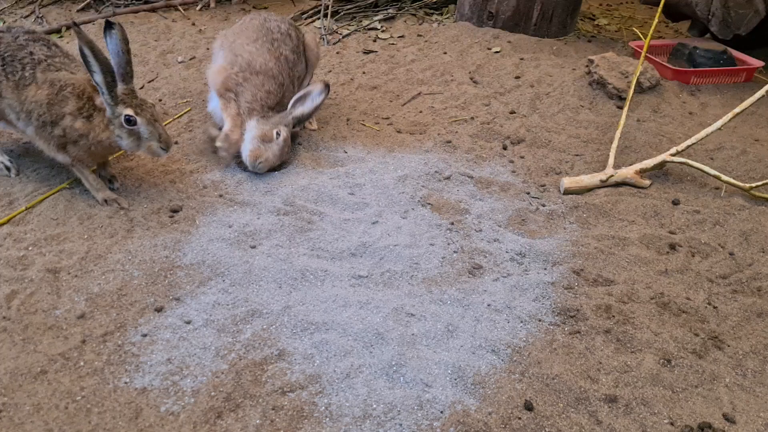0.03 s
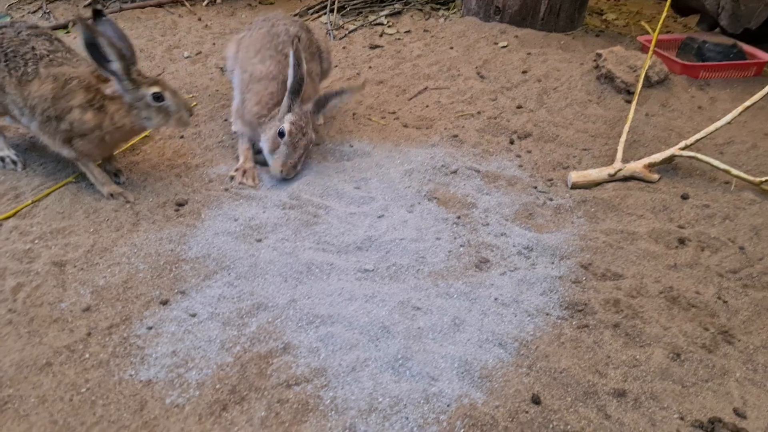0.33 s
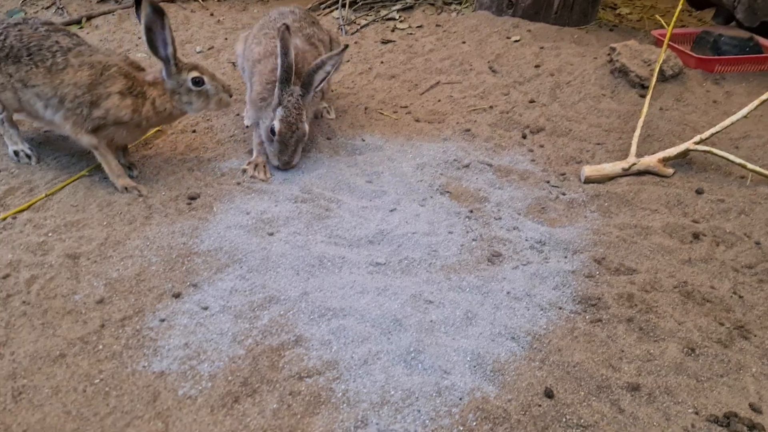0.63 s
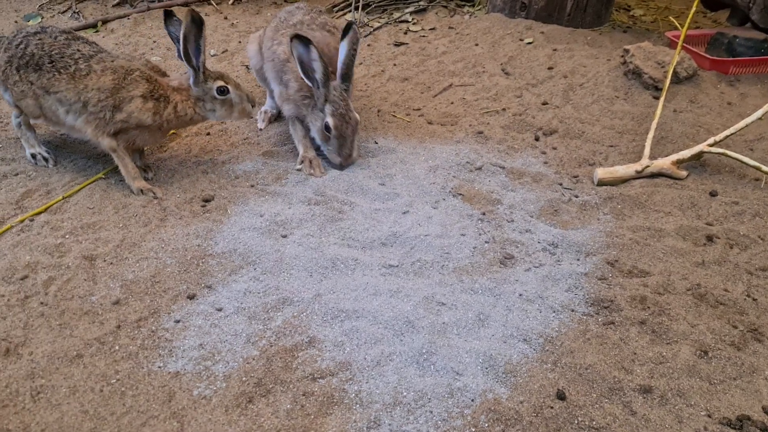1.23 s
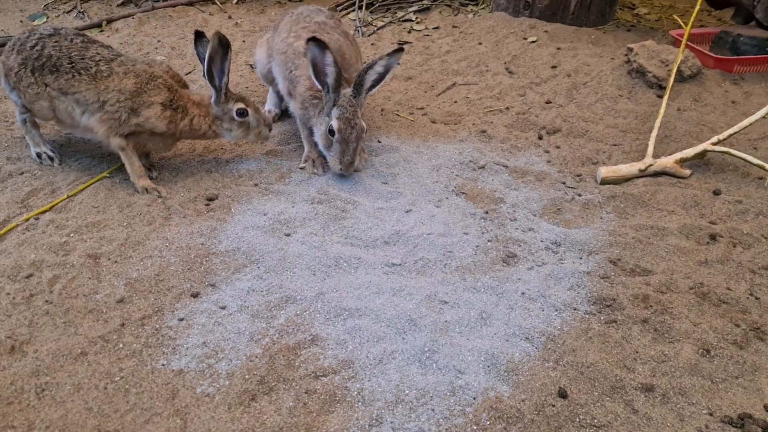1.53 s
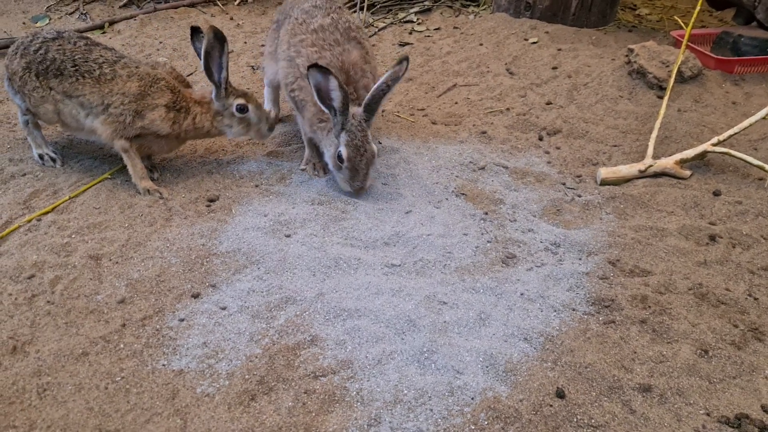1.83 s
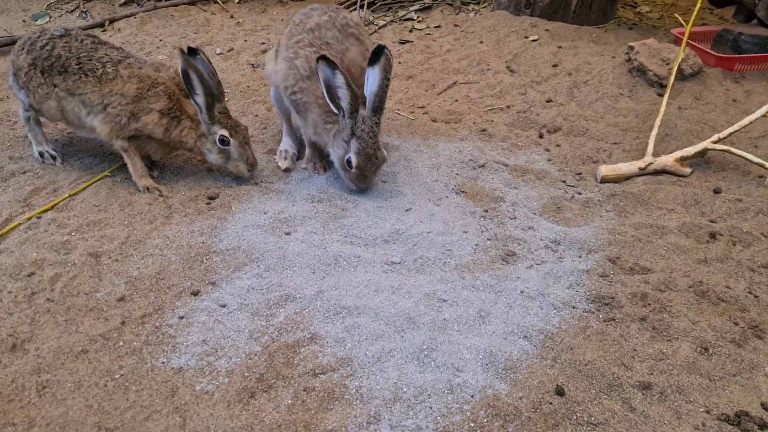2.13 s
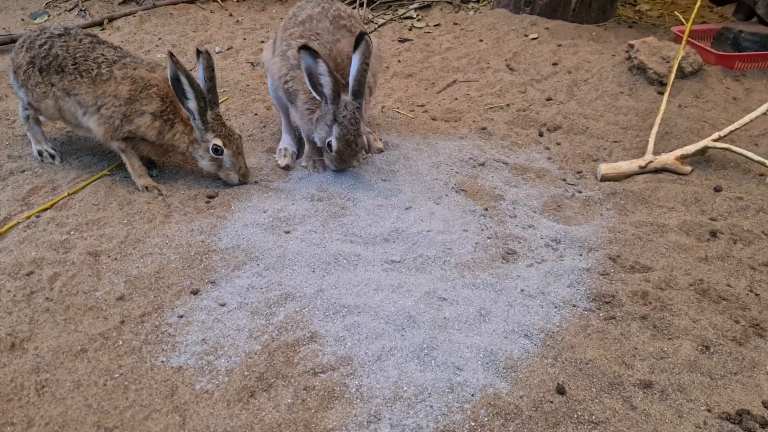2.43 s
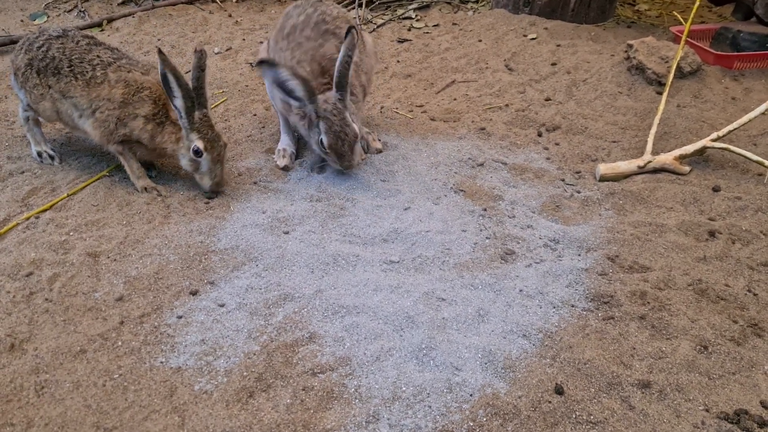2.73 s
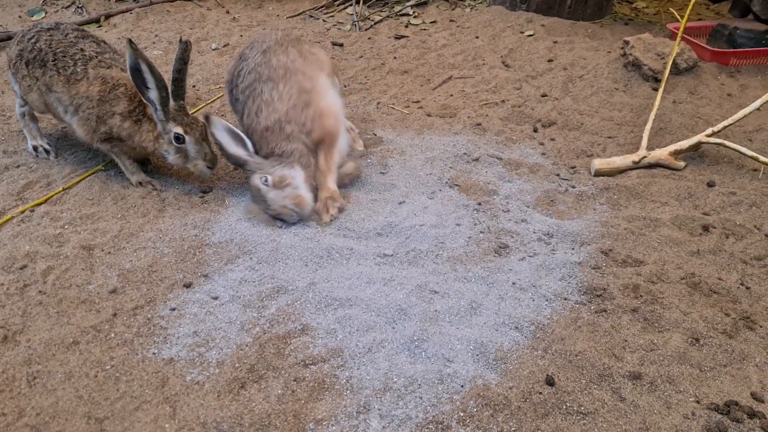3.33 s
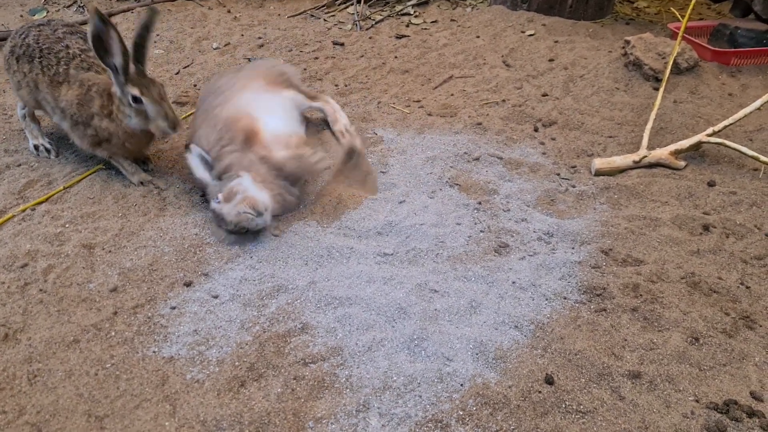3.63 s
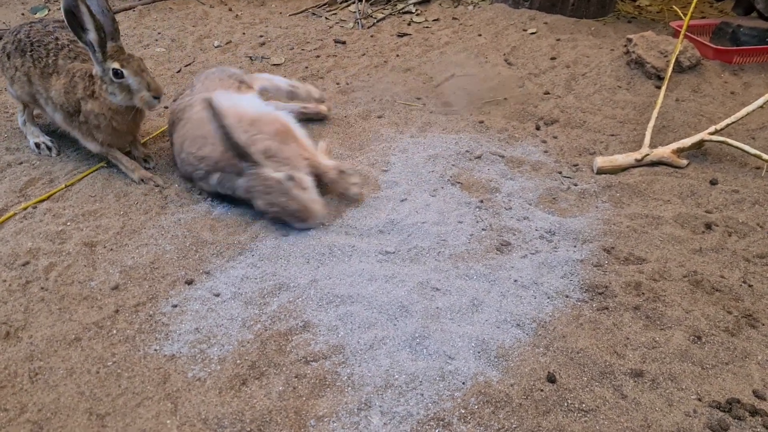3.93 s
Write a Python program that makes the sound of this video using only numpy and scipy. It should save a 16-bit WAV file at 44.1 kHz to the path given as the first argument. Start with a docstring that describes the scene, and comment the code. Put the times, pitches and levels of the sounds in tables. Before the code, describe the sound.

Two hares shuffle on dry sand, with soft paw thumps and gritty ticks over low rumble.

```python
"""A yard of dry sand, heard through a stereo pair of microphones. Two hares shuffle about and one rolls
over in a patch of ash: paws thump softly, grit ticks under the claws, sand scuffs and fur drags.
Far behind them an engine drones and fades over low outdoor rumble and quiet air; in the second half
come a distant whistling swell, a thin whir and one faint peep.
The microphones hiss faintly, brighter on the right."""
import sys
import numpy as np
from scipy import signal
from scipy.fft import rfft, irfft, next_fast_len
from scipy.io import wavfile
from scipy.ndimage import map_coordinates

SR = 44100
rng = np.random.default_rng(int(sys.argv[2]) if len(sys.argv) > 2 else 0)


def store_wav(level_fs):
    """Save 16-bit WAV to argv[1]."""
    pcm = np.round(np.clip(np.atleast_2d(level_fs), -1, 1) * 32767)
    wavfile.write(sys.argv[1], SR, pcm.T.astype(np.int16))


N = 176400
TIME = np.arange(N) / SR


def amp(db):
    """Decibels to gain."""
    return 10 ** (np.asarray(db) / 20)

def unit(x):
    """Scale to rms 1."""
    return x / np.sqrt(np.mean(x ** 2) + 1e-20)

def along(points, hz):
    """Read (freq_hz, value) points on a log frequency axis."""
    freqs, values = np.transpose(points)
    return np.interp(np.log(hz + 1), np.log(freqs + 1), values)

def curve(points):
    """Join (time_s, value) points with lines."""
    return np.interp(TIME, *np.transpose(points))

def wobble(per_s):
    """A smooth random curve with per_s knots a second."""
    return map_coordinates(rng.standard_normal(400), [TIME * per_s], mode="wrap")

def tone(pitch_hz):
    """A sine of rms 1 that follows a moving pitch."""
    return np.sqrt(2) * np.sin(2 * np.pi * np.cumsum(pitch_hz) / SR)

def filtered(x, response):
    """Pass x through a frequency response."""
    n = x.shape[-1]
    padded = next_fast_len(n + 4096)
    return irfft(rfft(x, padded) * response(np.fft.rfftfreq(padded, 1 / SR)), padded)[..., :n]

def band(x, centre_hz, octaves):
    """A bell-shaped band of x, at rms 1."""
    return unit(filtered(x, lambda hz: np.exp(-.5 * (np.log2((hz + 1) / centre_hz) / octaves) ** 2)))

def pan(db):
    """Left and right gains for a left-minus-right difference."""
    return amp(np.array([db, -db]) / 2).reshape(2, -1)

def from_afar(x, lead_s=.00033):
    """Far bass reaches the left microphone first and is slightly louder on the right."""
    return filtered(x, lambda hz: np.exp(1j * np.pi * hz * lead_s * np.array([[1], [-1]]))) * pan(-.5)

def grains(per_s, size):
    """Random impacts of uneven strength, reaching both microphones."""
    hits = (rng.random(size) < per_s / SR) * amp(3 * rng.standard_normal(size))
    return hits * rng.standard_normal((2, size))

def stroke(progress, rise_share=.15):
    """Rise and fall of a sliding movement; progress is time over its length."""
    return np.minimum(progress / rise_share, 1) * np.exp(-progress ** 3)

def add(track, start_s, x):
    """Mix x into track at start_s."""
    part = track[..., max(round(start_s * SR), 0):][..., :x.shape[-1]]
    part += x[..., :part.shape[-1]]


# How alike the two microphones hear steady noise: freq_hz, correlation
MIC_LIKENESS = [(60, .99), (130, 1), (250, 0.9), (500, 0.6), (1000, 0), (16000, 0)]
def rush(spectrum):
    """Stereo noise of rms 1, alike in the bass and unrelated in the treble."""
    def response(hz):
        angle = np.arccos(np.clip(along(MIC_LIKENESS, hz), -1, 1)) / 2
        return amp(along(spectrum, hz)) * [np.cos(angle), np.sin(angle)]
    mid, side = filtered(rng.standard_normal((2, N)), response)
    return unit(np.array([mid + side, mid - side]))


# The engine's firing tone, far off: time_s, pitch_hz
ENGINE_PITCH = [(0, 53.5), (.8, 54), (1.4, 54.5), (2.1, 53), (4, 55)]
# That tone and the hum above it, as they reach the yard: time_s, level_db
ENGINE_LEVEL = [(.07, -53.5), (.4, -47.5), (.6, -45.5), (1.1, -47), (1.4, -46), (1.7, -50), (2.1, -56),
                (3.1, -64), (4, -57)]
ENGINE_HUM_LEVEL = [(0, -66), (1.5, -61), (2.8, -63.5), (3.3, -74), (4, -78)]
def engine(hum_hz=98.36):
    """A far engine's wavering firing tone, and a weaker hum."""
    firing = tone(curve(ENGINE_PITCH) + .48 * wobble(4.97))
    firing *= amp(curve(ENGINE_LEVEL) + .8 * wobble(16))
    hum = amp(curve(ENGINE_HUM_LEVEL) + .33 * wobble(14)) * tone(hum_hz + wobble(3.94))
    return from_afar(firing + hum)


# Rumble and air all around the yard: freq_hz, density_db
RUMBLE_SPECTRUM = [(15, -8), (28, 2), (42, -10), (63, 4.5), (80, -1.5), (110, -7.5), (150, -7.5),
                   (185, -13), (220, -13.5), (270, -29), (450, -56.5)]
AIR_SPECTRUM = [(120, -1.5), (250, 1.5), (400, -2), (700, 2.5), (1100, 0), (1700, -10), (2300, -14.5),
                (3500, -16), (6000, -47), (15000, -74)]
# Their slow drift: time_s, level_db
RUMBLE_DRIFT = [(0, -56), (1, -57.5), (2.2, -57.5), (2.6, -55), (3.1, -55.5), (3.5, -58), (4, -60)]
AIR_DRIFT = [(0, -69), (.6, -67), (1.5, -67.5), (2.4, -68), (3.2, -67.5), (4, -69.5)]
def outdoors():
    """Low rumble and quiet air, both gently wavering."""
    rumble = amp(curve(RUMBLE_DRIFT) + wobble(8.1)) * rush(RUMBLE_SPECTRUM)
    air = amp(curve(AIR_DRIFT) + .92 * wobble(8.04)) * rush(AIR_SPECTRUM)
    return from_afar(rumble) + air * pan(-.06)


# Feet pushing through the sand: start_s, length_s, level_db, centre_hz, width_octaves
SAND_SCUFFS = [(0.061, 0.044, -65.5, 4040, 5.2), (0.101, 0.18, -78, 10100, 2.3),
               (.212, 0.048, -77, 4840, 0.44), (.55, 0.11, -78, 2040, 1.8), (0.976, 0.14, -74.5, 7000, 2.6),
               (1.208, 0.048, -74.5, 11800, 0.73), (1.409, 0.029, -73, 3550, 1.4),
               (1.446, 0.15, -76, 8300, 0.89), (1.72, 0.072, -71, 4650, 2.5), (1.99, 0.054, -84, 11500, .3),
               (2.026, 0.15, -74.5, 11500, 0.21), (2.37, 0.031, -67, 13300, 0.35),
               (2.371, 0.042, -70.5, 6700, 0.22), (2.376, 0.037, -68, 11030, .08),
               (2.85, .05, -79, 12000, 0.51), (3.061, 0.041, -75, 6000, 3.6),
               (3.664, 0.35, -76.5, 8400, 0.59), (3.76, 0.087, -72, 7060, 0.81),
               (3.773, 0.052, -67, 9900, 0.19), (3.962, 0.11, -69, 8160, 1.6)]
def scuffs():
    """Each scuff shifts many grains in one stroke."""
    out, t = np.zeros((2, N)), np.arange(SR // 3) / SR
    for start_s, length_s, db, hz, octaves in SAND_SCUFFS:
        sliding = band(grains(per_s=3500, size=len(t)), hz, octaves)
        add(out, start_s, amp(db + 2.5) * stroke(t / length_s) * sliding)
    return out


def trickle():
    """Loose grains keep trickling, faintly heard between the steps."""
    return amp(-90.5 + 4.9 * wobble(4.9)) * band(grains(per_s=900, size=N), 8000, octaves=.56)


# Grit underfoot: start_s, level_db, centre_hz, width_octaves, t60_s
GRIT_TICKS = [(0.143, -58, 5030, 0.72, 0.0081), (0.515, -52.5, 1670, 1, 0.024),
              (.521, -52, 6100, 0.22, 0.039), (0.552, -54, 2200, .9, 0.022),
              (0.565, -54, 2600, 0.92, 0.016), (.635, -62, 11500, 0.36, 0.037),
              (0.808, -58, 6000, 0.51, 0.016), (0.864, -57, 7050, 0.53, 0.022),
              (0.989, -61, 5300, 0.42, 0.035), (1.013, -55, 5700, 0.47, 0.034), (1.065, -72, 7000, .6, .03),
              (1.08, -51, 7940, 0.48, 0.031), (1.129, -57, 8000, 0.53, 0.04),
              (1.182, -53.5, 5160, 0.57, 0.039), (1.218, -63, 11500, .35, .025), (1.405, -53, 8500, 1, .03),
              (1.615, -60.5, 5060, 0.71, 0.081), (1.667, -57, 7760, 0.74, 0.1),
              (1.801, -54.5, 5800, 0.76, 0.039), (2.465, -54.5, 8400, 0.88, 0.044),
              (2.541, -57.5, 6760, 0.17, 0.03), (2.613, -52.5, 6000, 0.33, 0.016),
              (2.905, -58, 6000, .2, 0.02), (3.057, -53, 6500, 0.76, 0.016),
              (3.176, -51, 7500, 0.29, 0.022), (3.198, -59.5, 1830, 0.51, 0.08),
              (3.28, -50.5, 5750, 0.21, 0.018), (3.286, -55, 7360, 0.46, 0.1),
              (3.921, -56, 6100, 0.75, 0.059)]
def ticks(rise_share=.05):
    """Grit crunches under the claws in short bursts; longer ticks rise more slowly."""
    out, t = np.zeros((2, N)), np.arange(SR // 3) / SR
    for start_s, db, hz, octaves, t60_s in GRIT_TICKS:
        crunch = band(grains(per_s=7000, size=len(t)), hz, octaves)
        rise = 1 - np.exp(-t / (rise_share * t60_s))
        add(out, start_s, amp(db - 5 - 60 * t / t60_s) * rise * crunch)
    return out


# Paws landing, just right of centre: start_s, level_db, pitch_hz, t60_s
PAW_THUMPS = [(.216, -56, 560, 0.021), (0.515, -61, 576, 0.06), (.552, -60.5, 814, 0.047),
              (1.041, -58, 317, 0.055), (1.048, -61.5, 633, 0.034), (1.055, -58, 524, 0.058),
              (1.614, -52, 721, 0.041), (1.626, -59, 776, 0.043), (1.669, -52, 790, 0.015),
              (2.178, -57.5, 353, 0.025), (2.197, -68, 410, 0.026), (2.229, -63.5, 722, 0.068),
              (3.199, -58.5, 603, 0.026), (3.384, -60, 493, 0.031), (3.667, -63, 397, 0.041)]
# The ground's tones under a paw: pitch_ratio, gain_db
GROUND_MODES = [(0.521, -3), (.8, -2.5), (1, 5.5), (1.2, -3.5), (1.75, -18)]
def paws(rise_s=.0005):
    """Each footfall gives a few heavily damped ground tones and a dull puff."""
    out, t = np.zeros((2, N)), np.arange(SR // 4) / SR
    for start_s, db, hz, t60_s in PAW_THUMPS:
        ring = np.zeros(len(t))
        for ratio, gain_db in GROUND_MODES:
            gain = amp(gain_db + 1.5 * rng.normal())
            mode_hz = hz * ratio * (1 + .025 * rng.normal())
            ring += gain * np.sin(2 * np.pi * mode_hz * t)
        puff = amp(-2) * band(rng.standard_normal((2, len(t))), hz, octaves=.36)
        rise = 1 - np.exp(-t / rise_s)
        add(out, start_s, amp(db - 1.5 - 60 * t / t60_s) * rise * (ring + puff))
    return out * pan(-1.3)


# A rushing in the distance, a little to the right: freq_hz, density_db
SWELL_SPECTRUM = [(700, -45), (1150, -8), (1450, -4.5), (1700, -5), (1900, -8.5), (2500, -15.5),
                  (3200, -45)]
# Its rise and fall: time_s, level_db
SWELL_CONTOUR = [(0, -80), (.3, -78), (.45, -71), (.7, -78), (2.15, -78), (2.24, -70), (2.4, -68.5),
                 (2.52, -72), (2.63, -71), (2.85, -74), (4, -76.5)]
def swell():
    """Fluttering midrange noise that swells briefly early on and for longer past the middle."""
    return amp(curve(SWELL_CONTOUR) + 1.2 * wobble(40)) * rush(SWELL_SPECTRUM) * pan(-2.5)


# A body dragging over the ground, centred: start_s, length_s, level_db, centre_hz
BODY_DRAGS = [(0.563, 0.064, -68, 390), (1.621, .13, -71, 370), (3.04, 0.068, -67, 384)]
def fur():
    """A furry body slides on the sand with a dull rub."""
    out, t = np.zeros((2, N)), np.arange(SR // 3) / SR
    for start_s, length_s, db, hz in BODY_DRAGS:
        rub = band(rng.standard_normal(len(t)), hz, octaves=.61)
        add(out, start_s, amp(db) * stroke(t / length_s) * rub)
    return out


# Coarse grains underfoot: time_s, level_db, centre_hz, width_octaves
GRAIN_SNAPS = [(1.183, -55, 4300, .4), (1.408, -51, 12000, 0.22), (2.181, -59, 750, 1),
               (3.2815, -46, 5030, 0.3)]
def snaps():
    """A single coarse grain snaps with one sharp click."""
    out, size = np.zeros((2, N)), SR // 3
    lead_in_s = (size - 1) / SR / 2  # the click sits midway through its buffer
    for time_s, db, hz, octaves in GRAIN_SNAPS:
        click = band(signal.unit_impulse(size, "mid"), hz, octaves)
        add(out, time_s - lead_in_s, amp(db) * click / click.max())
    return out


# A whir in the background, well to the right: freq_hz, density_db
WHIR_SPECTRUM = [(4800, -22), (5400, -0.5), (6200, 6), (6900, 0.5), (7600, -18)]
# Its rise and fall: time_s, level_db
WHIR_CONTOUR = [(0, -92), (2.2, -81.5), (2.4, -87.5), (2.9, -78.5), (3.3, -81.5), (4, -81.5)]
def whir():
    """A thin, high band of noise that comes up in the second half."""
    return amp(curve(WHIR_CONTOUR) + wobble(14)) * rush(WHIR_SPECTRUM) * pan(-10)


# The whistling core of the distant swell: time_s, level_db
WHISTLE_CONTOUR = [(2.15, -100), (2.21, -74), (2.33, -73), (2.41, -64), (2.45, -72), (2.53, -70.5),
                   (2.585, -65), (2.64, -72), (2.73, -72.5), (2.9, -93)]
# Its glide: time_s, pitch_hz
WHISTLE_GLIDE = [(2.2, 1672), (2.41, 1705), (2.59, 1677), (2.8, 1620)]
def whistle(width_hz=80):
    """A breathy, narrow resonance that peaks twice and sinks a little."""
    flutter = unit(filtered(rng.standard_normal((2, N)), lambda hz: np.exp(-.5 * (hz / width_hz) ** 2)))
    return amp(curve(WHISTLE_CONTOUR)) * flutter * tone(curve(WHISTLE_GLIDE)) * pan(-2)


def peep(peak_s=2.322, width_s=.02, pitch_hz=5260):
    """One faint, narrow high note on the right."""
    envelope = np.exp(-.5 * ((TIME - peak_s) / width_s) ** 2)
    return amp(-78) * envelope * band(rng.standard_normal(N), pitch_hz, octaves=.017) * pan(-16)


# The microphones' colour on the sand sounds: freq_hz, gain_db
MIC_COLOUR = [(100, -24), (500, 14), (4500, -3), (6300, 3), (7500, -3), (8400, -17), (10000, -10),
              (11000, -11), (12000, -4), (12900, -8.5), (16000, -6)]
# Where the sand sits between the microphones: freq_hz, left_minus_right_db
SAND_BALANCE = [(300, -19), (1500, 0.5), (3300, -17.5), (5500, -10), (7400, -7), (9500, -18.5),
                (13000, -14.5)]
def sand_at_mics(sand):
    """The microphones colour the sand sounds, which lie mostly to the right."""
    return filtered(sand, lambda hz: amp(along(MIC_COLOUR, hz)) * pan(along(SAND_BALANCE, hz)))


def yard_echo(x, t60_s=.25):
    """A short, weak answer from the enclosure."""
    t = np.arange(SR // 3) / SR
    tail = rng.standard_normal((2, len(t))) * amp(-60 * t / t60_s)
    return amp(-5) * signal.fftconvolve(x, tail / np.linalg.norm(tail[0]), axes=1)[:, :N]


def scene():
    """The hares in their yard, over the background."""
    hares = paws() + fur() + sand_at_mics(ticks() + snaps() + scuffs() + trickle())
    return hares + yard_echo(hares) + engine() + outdoors() + swell() + whir() + whistle() + peep()


# Each microphone's own hiss: freq_hz, density_db
LEFT_MIC_HISS = [(1500, -7), (3500, 1), (5700, 4), (6200, 18.5), (7700, 15), (8300, -20), (9800, -22),
                 (12500, -12), (15800, -6)]
RIGHT_MIC_HISS = [(1500, -10.5), (3000, -5.5), (4800, -4), (6400, -2), (7300, -14), (8400, -26),
                  (10000, -14), (12000, -9), (13500, -11.5), (15800, -11.5)]
def record(dry, start_s=.069, top_hz=15750):
    """Each microphone adds its hiss; the sound opens after a moment of silence and is band-limited."""
    hiss = np.array([amp(-81) * rush(LEFT_MIC_HISS)[0], amp(-74) * rush(RIGHT_MIC_HISS)[1]])
    opening = np.clip((TIME - start_s) / .0019, 0, 1)
    return filtered((dry + hiss) * opening, lambda hz: hz < top_hz)


dry = scene()
out = record(dry)
store_wav(out)
```